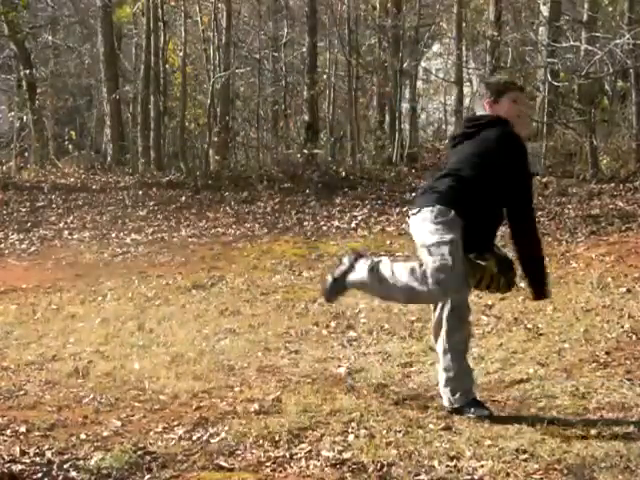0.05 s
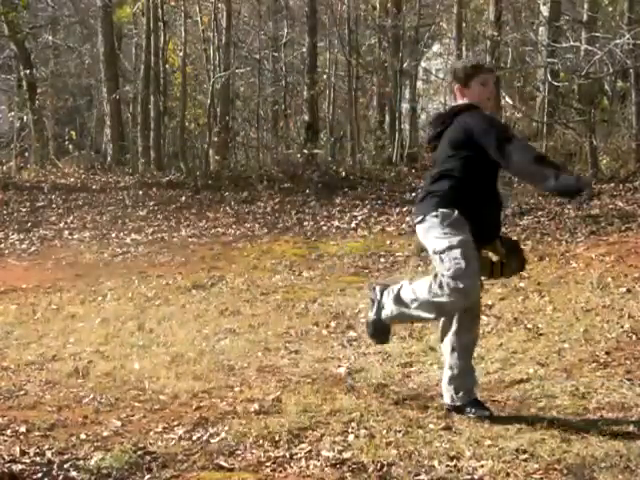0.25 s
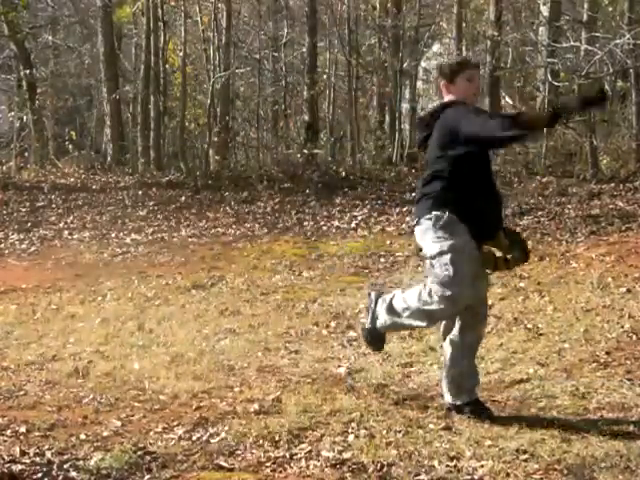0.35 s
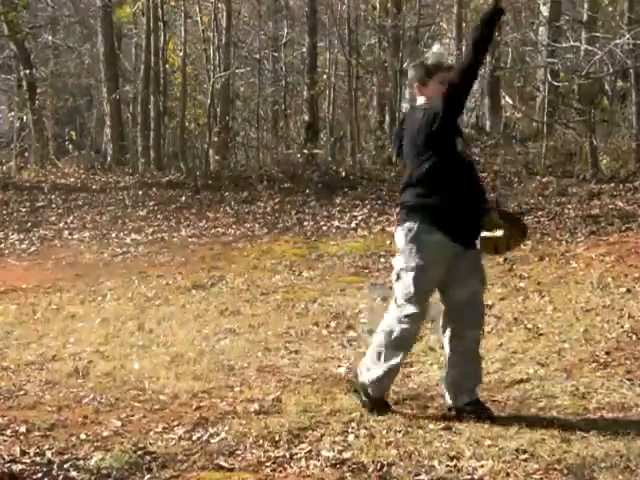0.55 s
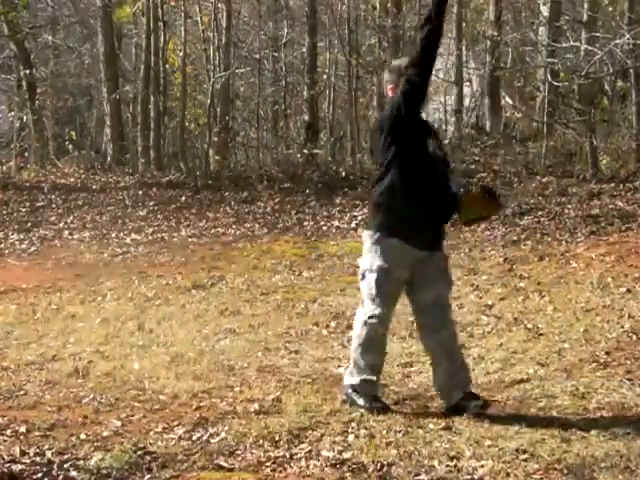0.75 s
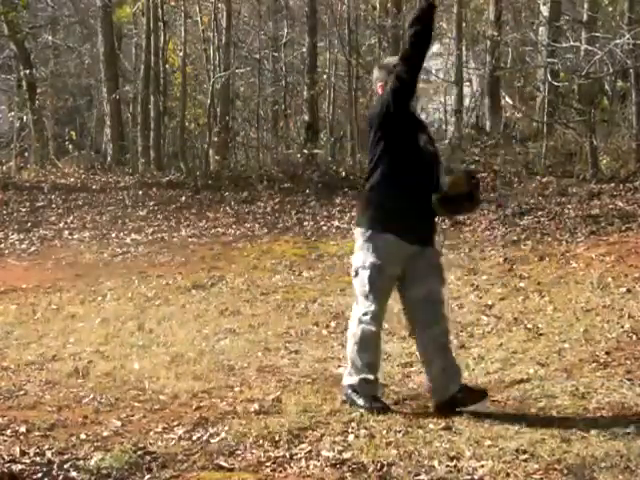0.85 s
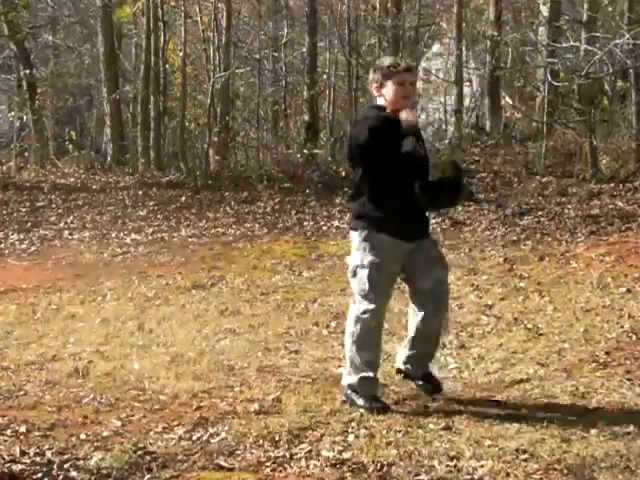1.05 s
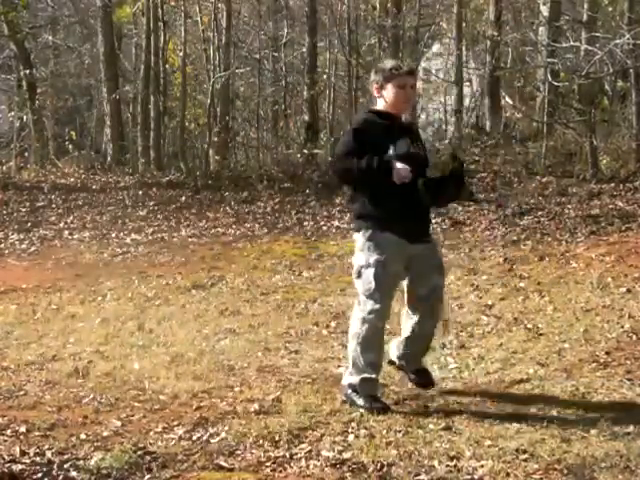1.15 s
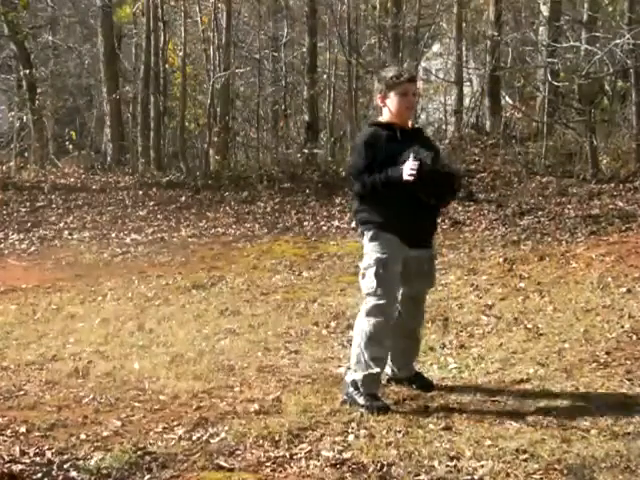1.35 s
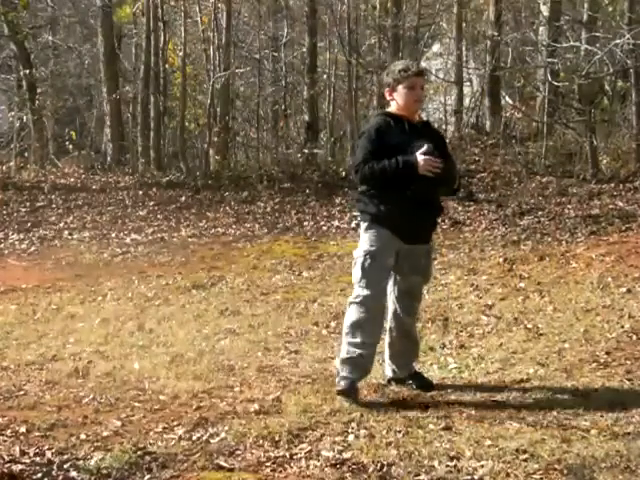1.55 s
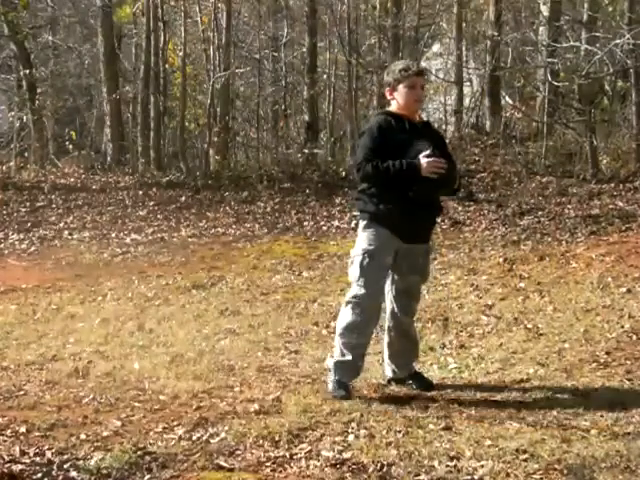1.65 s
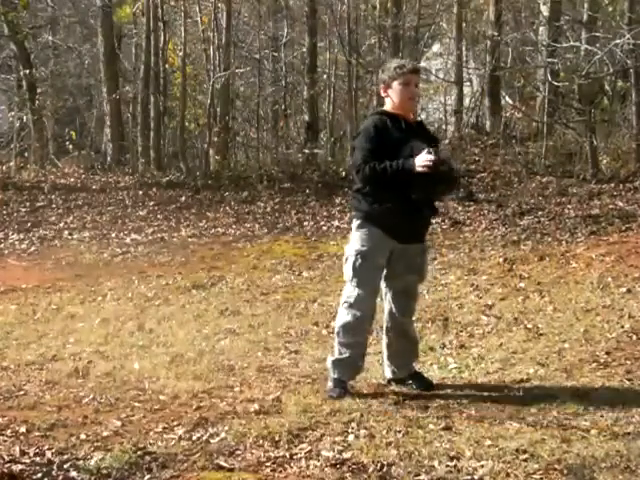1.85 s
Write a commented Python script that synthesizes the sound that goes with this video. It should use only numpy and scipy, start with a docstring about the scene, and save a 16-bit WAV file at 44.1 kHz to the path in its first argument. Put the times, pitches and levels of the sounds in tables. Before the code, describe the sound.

A ball hits a leather glove with one sharp, cracking pop at about 0.2 s, close and slightly left, followed by quick slap echoes and a noisy tail off bare trees, mostly fading by 0.8 s. A faint high bird whistle sags just before, at 0.1 s, and again at 1.15 s. Dry leaves crackle and shuffle softly from 0.5 to 1.8 s over low distant traffic and air.

```python
"""A ball lands in a leather glove a few metres from a stereo camcorder in a yard ringed by bare trees.
All along, far traffic and air make a floor of flickering noise. First a small bird calls, a sagging whistle.
Then the ball grazes the web and slams the pocket: pushes ring the pocket, snaps ring the leather.
Ground, walls and trunks send the pop back as single echoes and noisy tails. Later the thrower's shoes
stir dry leaves, in cracks and showers of tiny grains, and the bird calls once more among them."""
import sys
import numpy as np
from scipy import signal
from scipy.fft import rfft, irfft, next_fast_len
from scipy.io import wavfile
from scipy.ndimage import uniform_filter1d

SR = 44100
rng = np.random.default_rng(int(sys.argv[2]) if len(sys.argv) > 2 else 0)


def level_to_linear(level):
    """Convert decibel levels to linear amplitude factors, elementwise."""
    exponent = np.asarray(level, float) / 20
    return 10 ** exponent


def put_to_file(sound):
    """Save the sound as 16-bit audio at rate SR, in the file named by the first command-line argument."""
    columns = np.atleast_2d(sound).T  # one column per channel
    safe = np.clip(columns, -1, 1)
    whole_steps = np.round(safe * 32767)
    wavfile.write(sys.argv[1], SR, whole_steps.astype(np.int16))


N = 83790  # length in samples, 1.9 s
MID_TO_SIDE = np.array([[1], [-1]])  # a side signal is added on the left and taken away on the right
POP_S = .2175  # the tails of the pop start here
POP_PAN_DB = 1.7  # left louder than right


def band(x, lo_hz, hi_hz, order=2):
    """Keep only the pitches between two edges."""
    edges = [lo_hz, min(hi_hz, .45 * SR)]
    return signal.sosfilt(signal.butter(order, edges, "band", fs=SR, output="sos"), x)


def late(x, s):
    """Delay by any fraction of a sample, by turning the phase of each frequency."""
    n = next_fast_len(2 * len(x))
    hz = np.arange(n // 2 + 1) * SR / n
    return irfft(rfft(x, n) * np.exp(-2j * np.pi * hz * s), n)[:len(x)]


def unit(x):
    """Scale to rms 1."""
    return x / np.sqrt(np.mean(x ** 2))


def noise_band(lo_hz, hi_hz):
    """Random hiss between two edges, at rms 1."""
    return unit(band(rng.standard_normal(N), lo_hz, hi_hz))


def walk(rate_hz):
    """Slow random drift with spread 1: held random values, smoothed twice."""
    hold = int(SR / rate_hz)
    steps = np.repeat(rng.standard_normal(N // hold + 1), hold)
    return unit(uniform_filter1d(uniform_filter1d(steps, hold), hold)[:N])


def ring(x, modes):
    """Strike a body with x: each of its modes is a sine that dies away."""
    t = np.arange(SR // 5) / SR
    body = sum(level_to_linear(db - 60 * t / t60) * np.sin(2 * np.pi * hz * t) for hz, db, t60 in modes)
    return signal.fftconvolve(x, body)[:N]


def ears(x, lag_s, pan_db=0):
    """Two close capsules: left is late and right early by lag_s; their difference is lifted in the treble."""
    wide_db, wide_hz = 7, 2400
    left, right = late(x, lag_s), late(x, -lag_s)
    side = level_to_linear(wide_db) * band(left - right, wide_hz, .45 * SR, order=1) / 2
    side = side + np.tanh(pan_db * np.log(10) / 40) * x  # makes left louder by pan_db
    return (left + right) / 2 + side * MID_TO_SIDE


# swell of the traffic rumble: t/s, level/dB
RUMBLE = [(0, -0.5), (.45, -5), (.6, 1), (.75, 0.5), (.9, 0), (1.1, 0), (1.4, -3), (1.9, -2)]


def flickering_noise(shape, db, t):
    """Coloured noise in half-octave bands that flicker alone; the low ones swell with the traffic."""
    rumble_top_hz, flicker_db, flicker_hz = 387, 1.71, 5.894
    f = np.maximum(np.arange(N // 2 + 1) * SR / N, 1)
    shape_hz, shape_db = np.array(shape).T
    colour = level_to_linear(np.interp(np.log(f), np.log(shape_hz), shape_db))
    noise = rfft(rng.standard_normal(N)) * colour
    half_octave = np.round(2 * np.log2(f / 20))
    swell_db = np.interp(t, *np.array(RUMBLE).T)
    out = 0
    for k in range(20):
        centre_hz = 20 * 2 ** (k / 2)
        share = 1 / (1 + (centre_hz / rumble_top_hz) ** 2)  # how much of the swell this band follows
        level_db = share * swell_db + flicker_db * walk(flicker_hz)
        out = out + irfft(noise * (half_octave == k), N) * level_to_linear(level_db)
    return unit(out) * level_to_linear(db)


# colour of the background in the middle: f/Hz, relative level/dB
AIR_MID = [(12, -19), (20, -5.5), (53, 0), (91, -3.5), (250, -10), (426, -19.5), (473, -17.5), (617, -20),
           (3480, -39), (8580, -44), (11500, -53), (15000, -83), (22000, -120)]
# colour of the background at the sides: f/Hz, relative level/dB
AIR_SIDE = [(12, -31), (20, -1.5), (107, 3.5), (278, -3.5), (318, -2), (353, -3.5), (705, -7), (1650, -12),
            (3870, -15), (9300, -19), (11500, -32), (15000, -69), (22000, -120)]


def air(t):
    """Far traffic and air: one noise shared by both channels, another opposite in the two."""
    mid = flickering_noise(AIR_MID, -50.5, t)
    side = flickering_noise(AIR_SIDE, -58, t)
    return ears(mid, 0, pan_db=0.9) + side * MID_TO_SIDE


# bird calls: start t/s, length/s, level/dB, f/Hz that the pitch scoops towards, side level over mid/dB
BIRD_CALLS = [(.122, 0.099, -71, 7610, 6), (1.155, .12, -67, 7500, 5)]


def bird_voice(pitch_hz):
    """One whistle: a sine whose pitch and loudness tremble."""
    trembling_hz = pitch_hz + 130 * walk(250)
    return level_to_linear(3 * walk(90.6)) * np.sin(2 * np.pi * np.cumsum(trembling_hz) / SR)


def bird_smear(call, t):
    """Echoes of the call: a dying noise, convolved with it."""
    smear_db, smear_t60_s = -32.5, 0.22
    echoes_of_call = level_to_linear(smear_db - 60 * t / smear_t60_s) * rng.standard_normal(N)
    return call + signal.fftconvolve(call, echoes_of_call)[:N]


def bird(t):
    """A thin call that scoops up, splits in two and sags, smeared by its echoes."""
    scoop_hz, scoop_s, sag_hz_per_s = 1500, .007, 2500
    split_hz, split_s, fade_db_per_s = 592, 0.009, 101
    out = 0
    for start, length, db, hz, side_db in BIRD_CALLS:
        u = np.clip(t - start, 0, length)
        pitch = hz - scoop_hz * np.exp(-u / scoop_s) - sag_hz_per_s * u
        second_pitch = pitch - split_hz * (1 - np.exp(-u / split_s))
        ramps = np.clip(np.minimum(u / .004, (length - u) / 0.024), 0, 1)
        env = level_to_linear(db - fade_db_per_s * u) * ramps
        mid, side = (bird_smear(env * (bird_voice(pitch) + 0.64 * bird_voice(second_pitch)), t)
                     for _ in range(2))
        out = out + mid + level_to_linear(side_db) * side * MID_TO_SIDE
    return out


# single leaf cracks: start t/s, peak level/dB, f/Hz, left over right/dB
CRACKS = [(0.544, -50, 2000, 3), (0.67, -52, 3300, -4), (0.874, -59, 2520, -6), (1.336, -57.5, 2530, -7),
          (1.4001, -49.5, 1760, .5), (1.4723, -49.5, 2340, -4), (1.736, -47.5, 2970, -2),
          (1.7968, -56, 3600, 4)]


def leaf_cracks(t):
    """Dry leaves crack one by one: noise bursts of a few cycles."""
    out = 0
    for start, db, hz, pan_db in CRACKS:
        u = np.maximum(t - start, 0)
        burst = noise_band(hz / 1.31, hz * 1.19) * (u / 0.0014) * np.exp(1 - u / 0.001)
        out = out + ears(level_to_linear(db) * burst / np.abs(burst).max(), .00001, pan_db)
    return out


# shoes shuffling in leaves: start t/s, length/s, level/dB, f/Hz
SHUFFLES = [(0.533, 0.055, -67, 5100), (0.919, 0.037, -63.5, 1370), (1.452, 0.05, -75.5, 2520),
            (1.638, 0.12, -62.5, 2170)]


def leaf_shuffles(t):
    """Showers of random clicks, a few much stronger than the rest, each shower kept to one band of pitches."""
    grains_per_s, grain_spread = 1800, 3.7
    out = 0
    for start, length, db, hz in SHUFFLES:
        chance, strength, sign = rng.random((3, N))
        clicks = chance < grains_per_s / SR
        grains = clicks * (1 - strength) ** (-grain_spread / 20) * np.sign(sign - .5)
        env = np.sin(np.pi * np.clip((t - start) / length, 0, 1))
        out = out + ears(level_to_linear(db) * env * unit(band(grains, hz / 3.1, hz * 1.52)), .00001)
    return out


def tail_rise(t):
    """The tails start at the pop and build up over a few milliseconds."""
    return 1 - np.exp(-(np.maximum(t - POP_S, 0) / 0.0056) ** 2)


# scatter from the trunks: f/Hz, level/dB, t60/s, side level over mid/dB
TREES = [(121, -47, 0.079, -15), (241, -39, 0.17, -17.5), (527, -33.5, 0.26, -22), (820, -39.5, 0.4, -19),
         (1370, -42, 0.27, -12), (2000, -47, 0.48, -9), (3320, -40.5, 0.32, -5), (4700, -55, 0.55, 4),
         (6500, -41.5, 0.32, 1), (8000, -49.5, .3, 7)]


def trees(t):
    """Countless small echoes of the pop: noisy tails, each band with its own decay."""
    far_db, far_t60_s, far_top_hz = -20, 1.46, 4000
    patchy_db, slap_db = 1.2, 2.53
    u = np.maximum(t - POP_S, 0)
    slaps = level_to_linear(slap_db * walk(250))  # single trunks stand out in all bands at once
    out = 0
    for hz, db, t60, side_db in TREES:
        near = level_to_linear(-60 * u / t60)
        far = level_to_linear(far_db - 60 * u / far_t60_s) / (1 + (hz / far_top_hz) ** 2)
        fade = (near + far) * level_to_linear(db + patchy_db * walk(54.7)) * tail_rise(t) * slaps
        mid, side = (fade * noise_band(hz / 1.23, hz * 1.224) for _ in range(2))
        out = out + mid + level_to_linear(side_db) * side * MID_TO_SIDE
    return out


def far_trunks(t):
    """A narrow band of noise that lingers among the far trunks, then stops."""
    centre_hz, width_hz = 3160, 530
    linger_db, linger_t60_s, end_s = -58.5, 1.74, 0.81
    u = np.maximum(t - POP_S, 0)
    fade = level_to_linear(linger_db - 60 * u / linger_t60_s + 2 * walk(76)) * tail_rise(t)
    fade = fade / (1 + np.exp((t - end_s) / 0.0079))
    return ears(fade * noise_band(centre_hz - width_hz / 2, centre_hz + width_hz / 2), .00001)


# single echoes: delay t/s, level/dB, low edge f/Hz, high edge f/Hz, half the lag of left behind right/s
ECHOES = [(.0035, -15, 102, 3770, 0.000018), (0.01, -26, 102, 3700, .00001),
          (0.0213, -7.5, 2000, 8000, 0.000012), (0.061, -35, 300, 4000, .000005),
          (0.1737, -13.5, 3350, 8560, 0.000014), (0.4985, -25, 3400, 6500, 0.00001)]


def echoes(glove):
    """Single echoes: late copies of the pop, each with its own band of pitches."""
    out = 0
    for delay_s, db, lo_hz, hi_hz, lag_s in ECHOES:
        copy = late(band(glove, lo_hz, hi_hz), delay_s)
        out = out + ears(level_to_linear(db) * copy, lag_s, POP_PAN_DB / 2)
    return out


# the ball pushes into the pocket: start t/s, level/dB, length/s
CONTACTS = [(.21617, -8, .00018), (.21693, -18, .00097), (.21739, -1, .00015)]
# pocket of the glove, rung by the push: f/Hz, level/dB, t60/s
POCKET = [(165, -39, .07), (302, -31, .03), (400, -40, .04), (478, -40, .05), (714, -22, .024),
          (1012, -25, .024), (1600, -33, .015)]


def pocket_push(t):
    """The ball's smooth pushes ring the pocket."""
    push = 0
    for start, db, length in CONTACTS:
        push = push + level_to_linear(db) * np.sin(np.pi * np.clip((t - start) / length, 0, 1)) ** 2
    return ring(push, POCKET)


# the leather snaps taut: t/s, level/dB
SNAPS = [(.21645, -25), (.21752, -20), (.21772, -16), (.21874, -22), (.2198, -27)]
# stiff leather, rung by the snap: f/Hz, level/dB, t60/s
LEATHER = [(1800, -11, .008), (2950, -3.5, .008), (3900, -10, .005), (4870, -12, .006), (5700, -11, .005),
           (6400, -6, .007), (8140, -11, .005), (9600, -21, .003)]


def leather_snap():
    """Sharp snaps, each a single click, ring the stiff leather."""
    click = 1. * (np.arange(N) == 0)
    return ring(sum(level_to_linear(db) * late(click, s) for s, db in SNAPS), LEATHER)


def pop(t):
    """Pocket and leather sound together as the pop, with the deepest bass taken off."""
    return band(pocket_push(t) + leather_snap(), 140, .45 * SR)


def scene():
    """Floor, bird, leaves, tails, echoes and the pop, added up in stereo."""
    t = np.arange(N) / SR
    glove = pop(t)
    background = air(t) + bird(t) + leaf_cracks(t) + leaf_shuffles(t)
    tails = trees(t) + far_trunks(t)
    return background + tails + echoes(glove) + ears(glove, .00002, POP_PAN_DB)


def roll_off(x):
    """The treble ends steeply here."""
    return signal.sosfilt(signal.butter(12, 12140, fs=SR, output="sos"), x)


def record(dry):
    """The camcorder rounds the peak a little and rolls off the top."""
    soft_top, top_hz = 1.6, 10800
    rounded = soft_top * np.tanh(dry / soft_top)
    mix = signal.sosfilt(signal.butter(10, top_hz, fs=SR, output="sos"), rounded)
    return roll_off(mix)


dry = scene()
out = record(dry)
put_to_file(out)
```